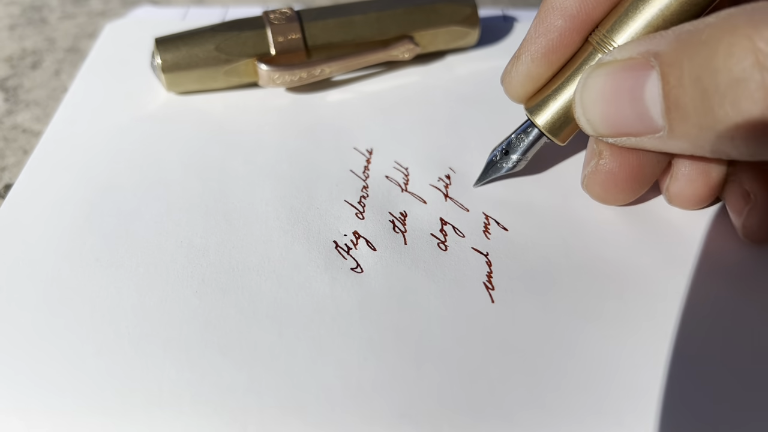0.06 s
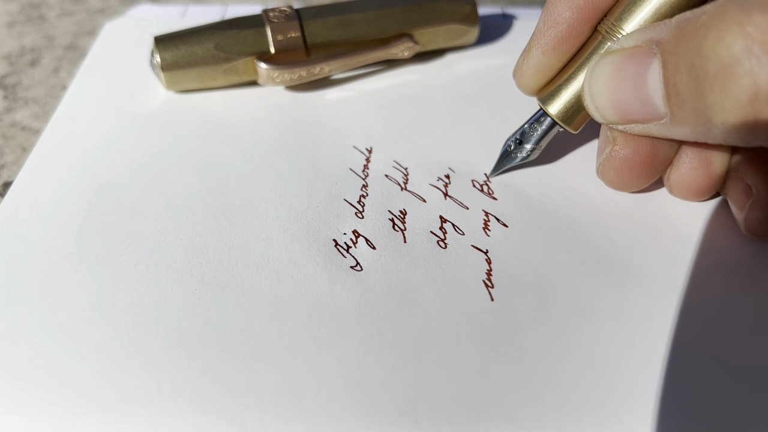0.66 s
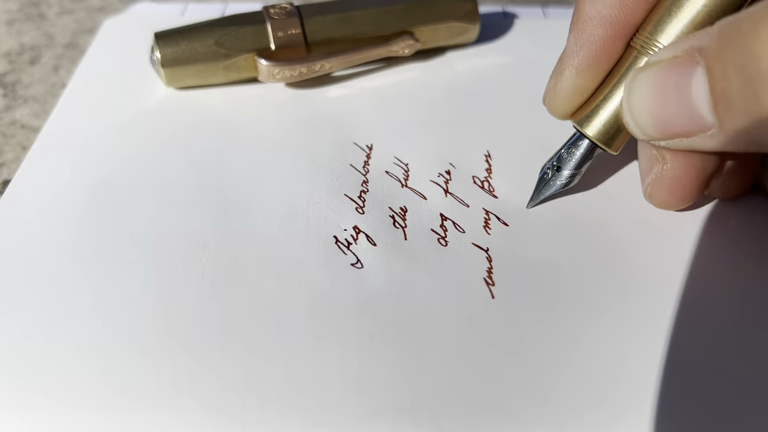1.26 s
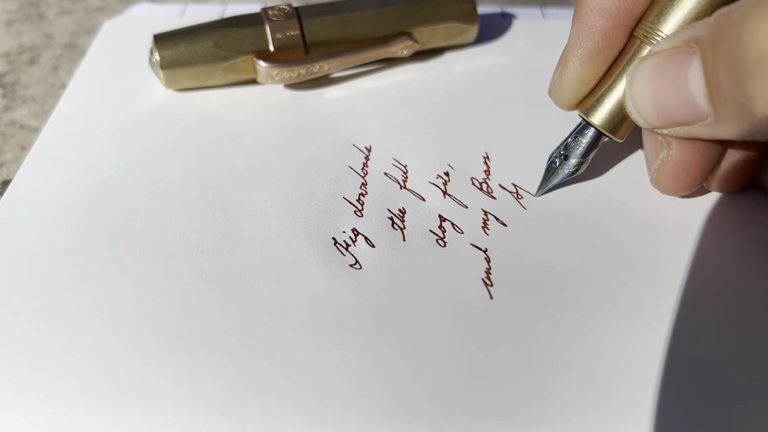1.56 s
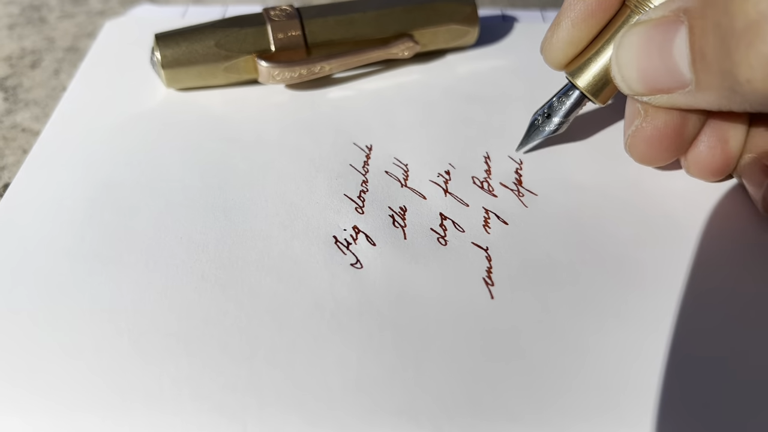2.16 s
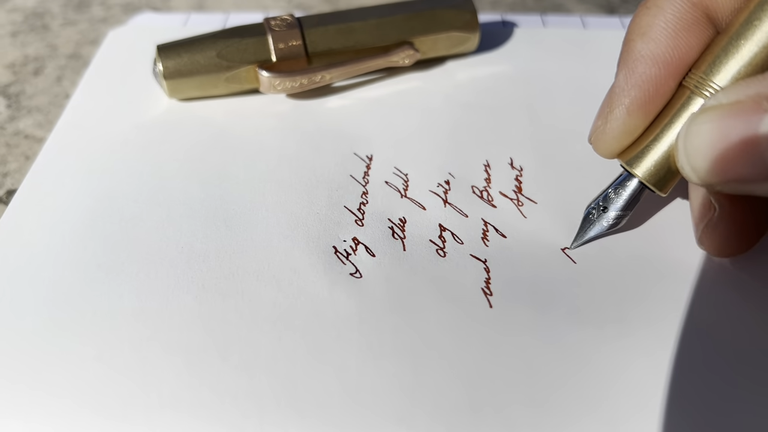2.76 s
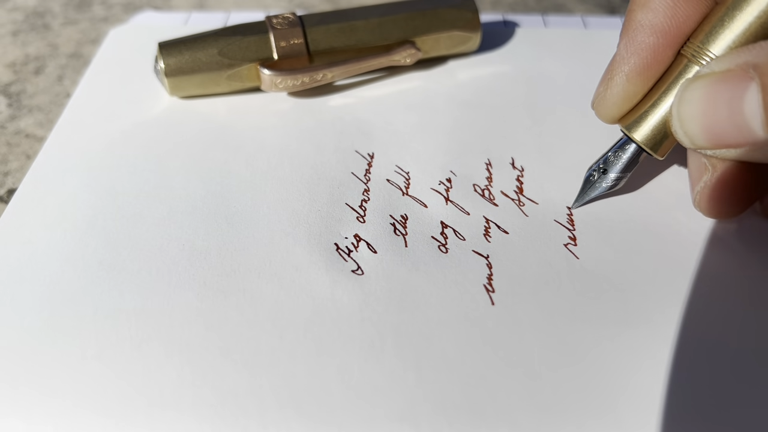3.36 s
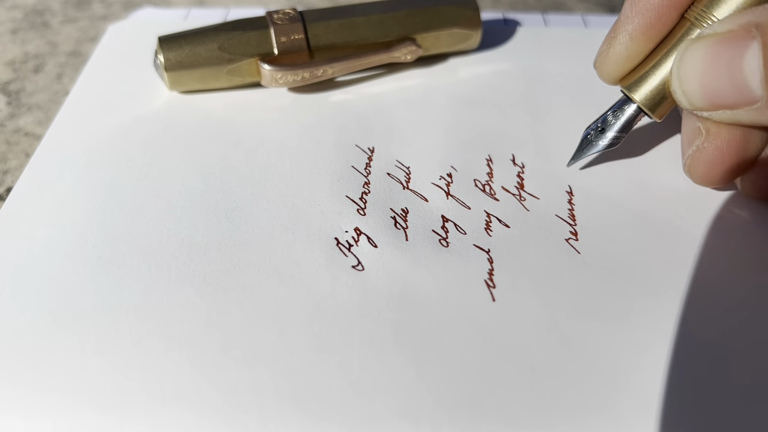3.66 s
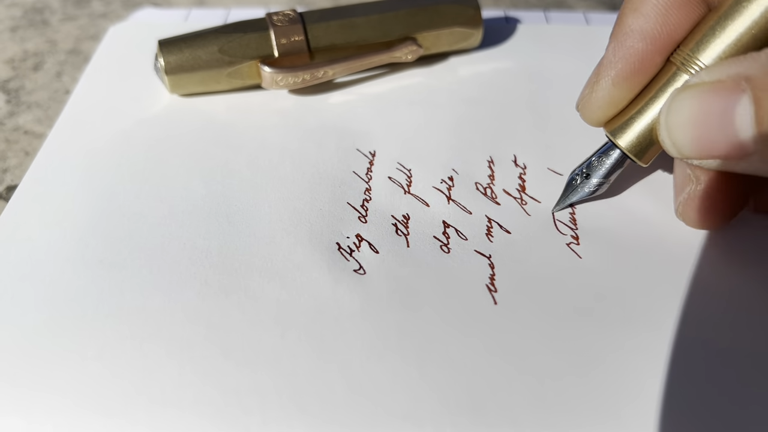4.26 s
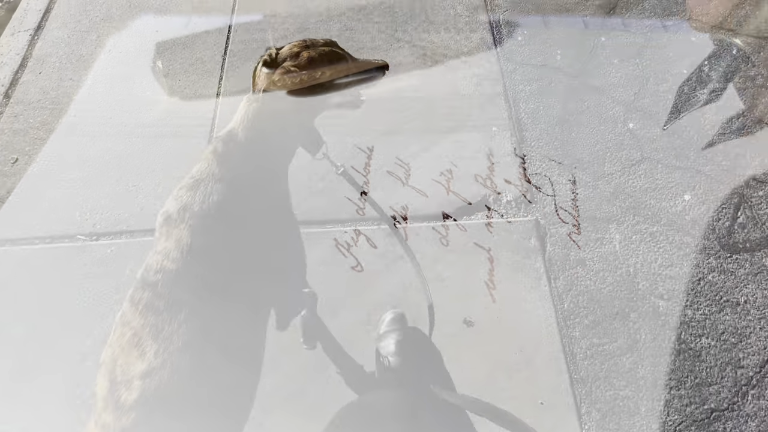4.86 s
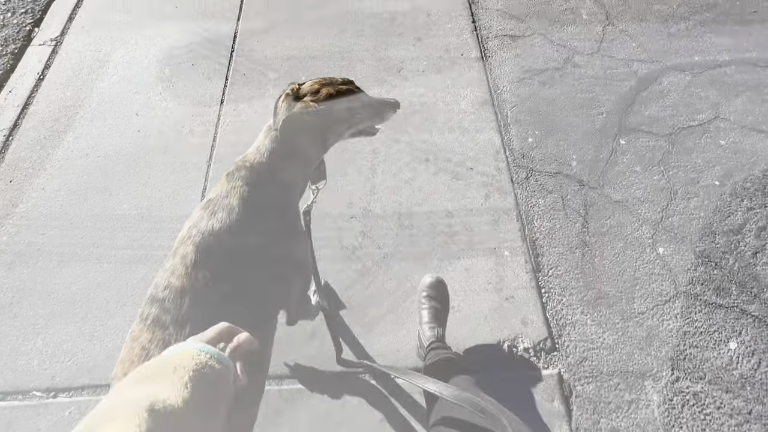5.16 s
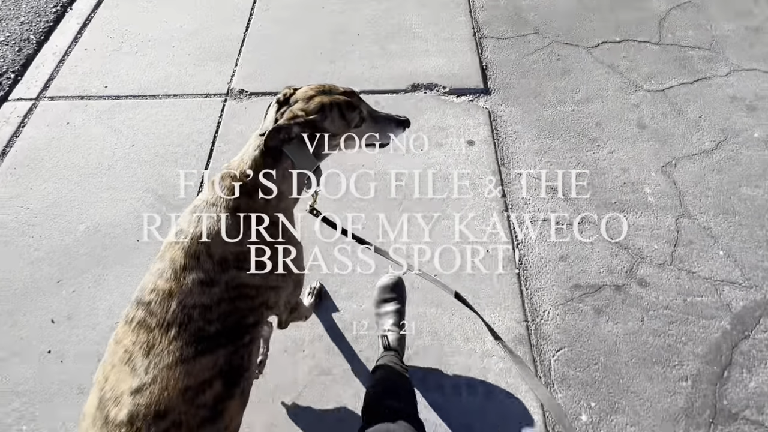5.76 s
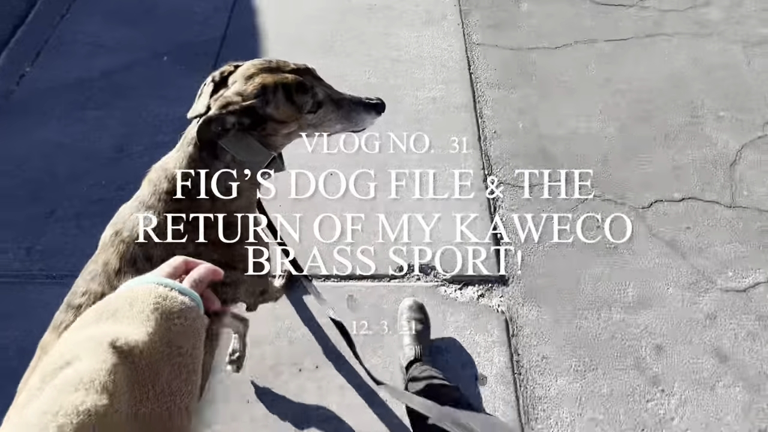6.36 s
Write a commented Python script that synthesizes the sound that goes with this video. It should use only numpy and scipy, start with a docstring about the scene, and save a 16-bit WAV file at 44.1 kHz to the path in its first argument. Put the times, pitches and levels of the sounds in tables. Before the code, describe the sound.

From the start, a fountain pen scratches quietly on paper close by, in short, uneven strokes with a thin metallic edge. Distant traffic hums low and steady underneath. The nib clicks faintly as it touches down, and a hand brushes over the sheet between words at about 1.1 and 2.4 seconds, with a dull rub near 3.2 seconds. The hardest strokes and a sharper tap come around 4.3 seconds.

From about 4.5 seconds the scene fades into a much louder street. A vehicle accelerates slightly to the left, its low engine note climbing steadily and strongest around 5.3 seconds. Its tyres swell to a roar as it passes near 5.8 seconds, then turn to a brighter rush over road rumble. A few faint ticks come from the pavement. The sound cuts out twice, very briefly, around 6.5 seconds.

```python
"""A fountain pen scratches a few words on a sheet of paper, over the low hum of distant traffic.
The nib drags across the fibres, shaking the sheet and setting its steel tines faintly ringing;
between words the hand slides over the paper. The scene then fades over to a pavement, where a vehicle
accelerates past, its exhaust note climbing and its tyres swelling to a rush as the treads pump air.
Near the end the sound cuts out twice, very briefly."""
import sys
import numpy as np
from scipy import signal
from scipy.fft import rfft, irfft
from scipy.io import wavfile
from scipy.ndimage import uniform_filter1d

SR = 44100
rng = np.random.default_rng(int(sys.argv[2]) if len(sys.argv) > 2 else 0)


def master_out(mix):
    """Clip the mix to full scale and print it as 16-bit PCM to the path in sys.argv[1]."""
    frames = np.transpose(np.atleast_2d(mix))
    ceiling = np.clip(frames, -1, 1)
    pcm = np.round(ceiling * 32767).astype(np.int16)
    wavfile.write(sys.argv[1], SR, pcm)


N = 287517
TIME = np.arange(N) / SR
FREQS = np.maximum(np.fft.rfftfreq(N, 1 / SR), 1)


def from_db(db):
    """Decibels to gain."""
    return 10 ** (np.asarray(db) / 20)


def rms_one(x):
    """Scale to unit power."""
    return x / np.sqrt(np.mean(x ** 2) + 1e-20)


def in_time(rows):
    """Breakpoints (time_s, values...) to one automation curve per value."""
    time_s, *columns = np.transpose(rows)
    return [np.interp(TIME, time_s, column) for column in columns]


def per_hz(points):
    """Breakpoints (freq_hz, value) to a curve over frequency."""
    hz, value = np.transpose(points)
    return np.interp(np.log(FREQS), np.log(hz), value)


def drift(rate_hz):
    """Slow random wander; rms 1."""
    return rms_one(irfft(rfft(rng.standard_normal(N)) / (1 + (FREQS / rate_hz) ** 2), N))


def white():
    """Two unrelated white noises."""
    return rng.standard_normal((2, N))


def stereo(pair, likeness):
    """Mix two unrelated signals as mid and side, with a left-right correlation set by band."""
    alike = np.clip(per_hz(likeness), -.99, .99)
    mid, side = rfft(pair)
    return irfft(np.sqrt(1 + alike) * mid + np.sqrt(1 - alike) * side * [[1], [-1]], N)


def pan(balance_db):
    """Left and right gains; positive leans left."""
    return from_db(np.array([[balance_db], [-balance_db]]) / 2)


def colour(x, spectrum):
    """Shape a signal with an EQ curve; rms 1."""
    return rms_one(irfft(rfft(x) * from_db(per_hz(spectrum)), N))


def resonate(x, hz, width_hz):
    """One resonance, gain 1 at its peak."""
    radius = np.exp(-np.pi * width_hz / SR)
    feedback = [1, -2 * radius * np.cos(2 * np.pi * hz / SR), radius ** 2]
    return signal.lfilter(np.array([1, 0, -1]) * (1 - radius ** 2) / 2, feedback, x)


def band(x, hz, width_hz):
    """A resonance with steep skirts; rms 1."""
    return rms_one(resonate(resonate(x, hz, width_hz), hz, width_hz))


def firing(hz, waver):
    """Phase of an engine that never runs quite evenly."""
    return 2 * np.pi * np.cumsum(hz * (1 + waver * drift(11.5))) / SR


def street_fade(start_s=4.47, end_s=5.375):
    """Crossfade from the writing (0) to the street (1)."""
    return np.interp(TIME, [start_s, end_s], [0, 1])


# Tone of the distant traffic bed: freq_hz, gain_db
TRAFFIC_EQ = [(25, -50), (48, -23), (64, -10.5), (80, -2.5), (115, 1), (220, -1), (330, -6), (550, -13),
              (900, -17.5), (1700, -17.5), (2700, -27), (4200, -39.5), (7000, -47.5), (16000, -51.5)]
# Its stereo image, wider in the highs: freq_hz, correlation
FAR_IMAGE = [(60, 1), (150, 0.98), (300, 0.9), (600, 0.71), (1200, 0), (3000, 0), (16000, 0.16)]
# A far motor gathering speed: time_s, firing_hz, firing_db, octave_db
FAR_MOTOR_REVS = [(0, 99, -59, -59.5), (.6, 103, -65, -53.5), (.9, 110.3, -76, -68),
                  (1.15, 114.2, -55.5, -59), (1.45, 114.3, -56.5, -62), (1.75, 120.7, -52.5, -66.5),
                  (2.0, 129.5, -66, -95), (2.5, 131.3, -94, -89)]
def distant_traffic(rumble_db=-52.0, hiss_db=-64.0, split_hz=450, hum_hz=64.8, hum_db=-69):
    """Dull rumble and road hiss with a steady hum and one far motor; they fade as the street comes in."""
    air = colour(stereo(white(), FAR_IMAGE), TRAFFIC_EQ)
    lows = irfft(rfft(air) / (1 + (FREQS / split_hz) ** 4), N)
    bed = from_db(rumble_db) * rms_one(lows) + from_db(hiss_db) * rms_one(air - lows)
    firing_hz, firing_db, octave_db = in_time(FAR_MOTOR_REVS)
    phase = firing(firing_hz, waver=0.0077)
    motor = from_db(firing_db) * np.sin(phase) + from_db(octave_db) * np.sin(2 * phase)
    hum = from_db(hum_db) * np.sin(firing(hum_hz, waver=0.015))
    return (bed + np.sqrt(2) * (motor + hum)) * (1 - street_fade())


# Stereo image of all the street noise: freq_hz, correlation
STREET_IMAGE = [(30, .05), (65, 0.06), (120, 0.31), (250, 1), (900, 0.86), (2000, 0.28), (5000, 0.28),
                (16000, 0.19)]
def far_tyres(level_db=-52.0, hz=1400, width_hz=560):
    """The steady hiss of tyres farther down the street."""
    lowpass = signal.butter(6, hz + width_hz, fs=SR, output="sos")
    hiss = signal.sosfilt(lowpass, band(white(), hz, width_hz))
    return from_db(level_db) * street_fade() * stereo(hiss, STREET_IMAGE)


PASS_S = 5.8  # the vehicle draws level
def passing(peak_db, after_s, near_s, beam=1):
    """Pass-by swell, faded in with the street: level falls with distance, faster for beamed sound."""
    distance = np.hypot(1, (TIME - PASS_S - after_s) / near_s)
    return street_fade() * from_db(peak_db) / distance ** beam


# Notes of other vehicles: pitch_at_pass_hz, climb_hz_per_s, relative_db
TRAFFIC_TONES = [(202.8, 3, -9.5), (290.8, 7, -10.5)]
def other_traffic(rough_db=4.0):
    """Other vehicles in the street add wavering, slowly climbing tones."""
    tones = np.zeros(N)
    for pitch_hz, climb_hz_per_s, relative_db in TRAFFIC_TONES:
        gain = from_db(relative_db + rough_db * drift(15))
        tones += gain * np.sin(firing(pitch_hz + climb_hz_per_s * (TIME - PASS_S), waver=0.0097))
    return np.sqrt(2) * tones


# Bands of tread hiss: pitch_hz, width_hz, peak_db, peak_after_pass_s
TREAD_BANDS = [(700, 200, -48, .05), (2440, 310, -63.5, .05), (4230, 450, -71.5, .02),
               (10800, 5600, -73, 0.57)]
def treads(near_s=0.17):
    """Air is pumped out of the tyre treads; each pitch is beamed its own way and sweeps past."""
    air = sum(passing(peak_db, after_s, near_s) * band(white(), pitch_hz, width_hz)
              for pitch_hz, width_hz, peak_db, after_s in TREAD_BANDS)
    return stereo(air, STREET_IMAGE)


# The near engine revving up: time_s, firing_hz, level_db
ENGINE_REVS = [(4.36, 103, -92), (4.48, 104, -49.5), (4.88, 108.7, -49.5), (5.17, 114.1, -36.5),
               (5.33, 121.6, -32.5), (5.52, 126.4, -35.5), (5.69, 129.5, -44.5), (5.98, 141.5, -42),
               (6.52, 156.6, -47)]
# Partials of its exhaust: firing_multiple, relative_db
EXHAUST_ORDERS = [(1, -0.5), (1.5, -17), (2, -28), (3, -15.5), (4, -25.5)]
def engine(rough_db=1.1):
    """Exhaust orders climb as the vehicle accelerates, each fluttering in level."""
    firing_hz, level_db = in_time(ENGINE_REVS)
    phase = firing(firing_hz, waver=0.0077)
    exhaust = sum(from_db(level_db + relative_db - rough_db * drift(6.6)) * np.sin(multiple * phase)
                  for multiple, relative_db in EXHAUST_ORDERS)
    audible = TIME > ENGINE_REVS[0][0]
    return np.sqrt(2) * audible * exhaust


# Droning resonances of the street traffic: pitch_hz, width_hz, relative_db
STREET_DRONES = [(110, 9, -33), (210.7, 14, -13.5), (282.6, 10, -12), (467.3, 14.4, -14)]
# Low road rumble, midrange tyre roar and bright tyre rush: freq_hz, gain_db
RUMBLE_EQ = [(20, -39), (35, -31), (52, 0), (70, -1), (100, 2.5), (170, -4.5), (260, -4.5), (380, -11),
             (480, -10), (700, -52), (1200, -63)]
ROAR_EQ = [(300, -7), (560, -1.5), (740, 4.5), (870, 9.5), (980, 3.5), (1150, 1), (1650, -9), (2000, -16),
           (2650, -23), (3100, -33), (5000, -91)]
RUSH_EQ = [(300, -26), (600, 8), (790, 4.5), (1000, 2.5), (1900, -1.5), (2700, -6), (3200, -13),
           (4400, -16), (5200, -19.5), (6600, -19), (10000, -27), (12200, -32.5), (14000, -56),
           (16000, -33)]
# Panning of the tyres by band: freq_hz, left_minus_right_db
TYRE_PAN = [(400, 13), (700, 2.5), (1290, 5), (2200, -0.5), (4400, 4.5), (8000, 3.5), (15000, -11)]
def street(rumble_db=2.03, flutter_db=1.24, lag_s=0.00046):
    """Engine, rumble and tyres swell past, off to the left, so they reach the right side later."""
    low_swell = passing(peak_db=-36.5, after_s=0.43, near_s=0.83)
    roar_swell = passing(peak_db=-38.0, after_s=-0.074, near_s=0.43)
    rush_swell = passing(peak_db=-43.0, after_s=0.31, near_s=0.64, beam=1.39)
    drone = sum(from_db(relative_db) * band(rng.standard_normal(N), pitch_hz, width_hz)
                for pitch_hz, width_hz, relative_db in STREET_DRONES)
    rumble = low_swell * (from_db(rumble_db) * colour(stereo(white(), STREET_IMAGE), RUMBLE_EQ) + drone)
    roar = roar_swell * from_db(flutter_db * drift(20)) * colour(stereo(white(), STREET_IMAGE), ROAR_EQ)
    # the bright rush takes over from the roar as the vehicle goes by
    rush = rush_swell * colour(stereo(white(), STREET_IMAGE), RUSH_EQ)
    tyre_gains = from_db(per_hz(TYRE_PAN) * [[.5], [-.5]])
    tyres = irfft(rfft(roar + rush + treads() + far_tyres()) * tyre_gains, N)
    motors = engine() + low_swell * other_traffic()
    left, right = rumble * pan(balance_db=1.3) + tyres + motors * pan(balance_db=1.5)
    return np.array([left, np.interp(TIME - lag_s, TIME, right)])


# Small ticks of the pen, then of things on the pavement: start_s, level_db, pitch_hz
TICK_CUES = [(4.202, -73, 8000), (4.789, -61, 6460), (4.799, -67, 8500), (4.849, -56.5, 3850),
             (5.035, -63, 5830), (5.067, -66, 8500), (5.084, -57, 9490), (5.410, -57, 9000),
             (5.572, -53.5, 6960), (6.355, -46.5, 7360)]
def ticks(attack_s=0.0018, trim_db=-3.5, width_share=0.62):
    """Each tick is a short crunch around a pitch of its own."""
    track = np.zeros((2, N))
    age = TIME[:SR // 20] / attack_s
    envelope = age * np.exp(1 - age)
    for start_s, level_db, pitch_hz in TICK_CUES:
        at = int(start_s * SR)
        crunch = band(rng.standard_normal((2, len(age))), pitch_hz, width_share * pitch_hz)
        track[:, at:at + len(age)] += from_db(level_db + trim_db) * envelope * crunch
    return track


def fibres(snaps_per_s, spread_db, smooth_share):
    """Paper fibres snap free at random, a few of them hard, over smooth friction."""
    sizes = from_db(spread_db * np.minimum(rng.exponential(1, (2, N)), 4))
    snaps = (rng.random((2, N)) < snaps_per_s / SR) * sizes * np.sign(white())
    return rms_one(rms_one(snaps) + smooth_share * white())


def stroke(fastest_s, length_s):
    """The samples of one movement and its speed, which rises and falls in an arch."""
    start_s, end_s = fastest_s - length_s / 2, fastest_s + length_s / 2
    span = slice(max(int(start_s * SR), 0), int(end_s * SR))
    return span, np.sin(np.pi * np.interp(TIME[span], [start_s, end_s], [0, 1]))


def held(start_s, end_s, edge_s):
    """Attack, hold and release of a steady contact."""
    return np.clip(np.minimum(TIME - start_s, end_s - TIME) / edge_s + 1, 0, 1)


# The hand sliding over the sheet: fastest_s, length_s, level_db
HAND_SLIDES = [(1.103, 0.18, -65), (1.133, 0.099, -58), (2.359, 0.14, -55), (2.397, .1, -55),
               (3.815, .15, -68.5), (3.978, .045, -71.5), (4.055, 0.13, -74.5), (4.906, .075, -68)]
# Skin on paper, brushing lightly and rubbing dully: freq_hz, gain_db
BRUSH_EQ = [(600, -20), (1100, -4), (1600, 0), (2100, -3), (3200, -2), (4200, -10), (6300, -15),
            (8000, -11), (10500, -13), (13000, -10), (16000, -9)]
RUB_EQ = [(250, -9), (480, 4.5), (700, -8.5), (1200, -3), (1600, -9), (2500, -20), (5000, -50), (9000, -87)]
# Stereo images of the brushing, and of the sheet under rub and nib: freq_hz, correlation
BRUSH_IMAGE = [(1500, 0.66), (3000, 0.11), (8000, 0.16), (13000, 0.15)]
SHEET_IMAGE = [(500, 0.86), (1700, 0.93), (2500, 0.039), (4000, 0.16), (16000, 0.57)]
def hand(trim_db=-0.3, sharpness=2.85, rub_db=-57.8):
    """Skin brushes the sheet with an airy, fine-grained hiss; once, the side of the hand drags dully."""
    pressure = np.zeros(N)
    for fastest_s, length_s, level_db in HAND_SLIDES:
        span, speed = stroke(fastest_s, length_s)
        pressure[span] += from_db(level_db + trim_db) * speed ** sharpness
    grain = fibres(snaps_per_s=9800, spread_db=4.5, smooth_share=0.88)
    brush = colour(stereo(grain, BRUSH_IMAGE), BRUSH_EQ)
    rub = colour(stereo(white(), SHEET_IMAGE), RUB_EQ)
    return pressure * brush + from_db(rub_db) * held(start_s=3.12, end_s=3.33, edge_s=.03) * rub


# Resonances of the sheet under the nib: pitch_hz, width_hz, gain_db
SHEET_MODES = [(900, 270, -13), (1105, 136, 4), (1203, 112, 7), (1500, 186, 6), (1675, 180, 3.5),
               (1915, 143, 2.5), (2120, 410, -7.5), (2730, 110, -21), (3130, 99, -15), (4420, 300, -51)]
def sheet(force, low_cut_hz=1080):
    """The paper rings in modes of alternating polarity and radiates little low end."""
    modes = sum((-1) ** k * from_db(gain_db) * resonate(force, pitch_hz, width_hz)
                for k, (pitch_hz, width_hz, gain_db) in enumerate(SHEET_MODES))
    return signal.sosfilt(signal.butter(4, low_cut_hz, "high", fs=SR, output="sos"), modes)


# The nib touching down or snagging: start_s, peak_db
NIB_CATCHES = [(1.357, -47), (1.597, -44), (2.236, -55), (2.663, -45.5), (2.803, -50), (2.995, -43.5),
               (4.281, -39), (4.345, -31.5)]
def catches():
    """Each catch of the nib is one knock on the sheet."""
    knocks = np.zeros(N)
    for start_s, peak_db in NIB_CATCHES:
        knocks[int(start_s * SR)] = from_db(peak_db)
    unit_peak = np.abs(sheet(signal.unit_impulse(SR // 20))).max()
    return sheet(knocks + 1e-18) / unit_peak


# Friction hiss of the fibres: freq_hz, gain_db
FIBRE_EQ = [(400, -3), (800, 7.5), (2500, 2.5), (3600, -9.5), (4500, -5), (6000, -8.5), (9000, -9),
            (10000, -16), (11200, -14), (13000, -25), (16000, -16)]
# Runs of letters, nib down and held at one angle: start_s, end_s, drag_db, ring_gain_db
PEN_WORDS = [(0.092, 0.427, -78.5, -10), (.53, 1.06, -85, -15), (1.29, 1.647, -69, -14.5),
             (1.672, 2.31, -88, -13), (2.646, 3.665, -83, -19.5), (3.8, 3.83, -81, -4.5),
             (4.233, 4.372, -67.5, -15.5)]
# Pen strokes, ringing higher or lower with their direction: fastest_s, length_s, level_db, pitch_hz
PEN_STROKES = [(0.116, 0.045, -53, 7150), (0.176, .055, -53.5, 7250), (0.23, 0.048, -60, 7100),
               (.285, 0.029, -67.5, 7640), (.324, 0.042, -63.5, 7050), (0.38, 0.082, -70.5, 7500),
               (0.553, 0.031, -63, 6860), (0.665, 0.017, -68, 7050), (.699, 0.039, -67, 7180),
               (0.778, .053, -62, 7600), (.856, 0.045, -73, 7110), (.908, 0.061, -66, 7260),
               (1.049, 0.031, -59, 7160), (1.311, 0.053, -49, 7430), (1.367, .036, -61, 7100),
               (1.477, .046, -62, 7600), (1.541, 0.043, -60.5, 6960), (1.596, 0.025, -56, 7050),
               (1.62, 0.029, -61, 7500), (1.68, 0.028, -67, 7030), (1.729, 0.054, -61, 7490),
               (1.794, 0.024, -66, 7300), (1.827, 0.03, -65, 7630), (1.888, 0.031, -68.5, 7500),
               (1.964, .032, -70, 7660), (1.995, 0.044, -60, 7100), (2.046, 0.022, -58, 6960),
               (2.075, 0.036, -63.5, 7280), (2.24, .03, -68, 7830), (2.282, 0.056, -62, 7600),
               (2.68, .038, -54.5, 7390), (2.774, 0.071, -72, 7040), (2.81, .04, -62.5, 7620),
               (2.872, 0.047, -67, 7120), (2.912, .045, -63, 7600), (2.943, 0.033, -54, 7250),
               (2.999, 0.052, -61, 7270), (3.04, 0.038, -59.5, 7530), (3.14, .05, -69, 7460),
               (3.218, 0.038, -64, 7500), (3.317, 0.05, -62, 7600), (3.37, .029, -67, 7160),
               (3.42, 0.025, -62, 7450), (3.501, 0.029, -58.5, 7700), (3.569, 0.033, -72, 7200),
               (3.634, 0.037, -57.5, 7620), (3.808, 0.018, -59.5, 7330), (4.255, .035, -56, 7600),
               (4.275, 0.035, -45, 7650), (4.3, .07, -53.5, 7200), (4.351, 0.035, -50.5, 7400)]
def pen(paper_db=-1.5, hiss_db=-14.5, rasp_db=-11, scrape_db=-66,
        nib_db=-4.0, nib_hz=7250, nib_width_hz=900, nib_hiss_db=3.5):
    """The dragging nib shakes the sheet and rings at a pitch that changes with each stroke."""
    drag = fibres(snaps_per_s=1100, spread_db=3.0, smooth_share=1.0)
    hiss = colour(drag, FIBRE_EQ)
    force = sum(from_db(drag_db) * held(start_s, end_s, edge_s=0.0087)
                for start_s, end_s, drag_db, _ in PEN_WORDS)
    tines = force * band(drag, nib_hz, nib_width_hz)
    for fastest_s, length_s, level_db, pitch_hz in PEN_STROKES:
        span, speed = stroke(fastest_s, length_s)
        push = from_db(level_db) * speed
        force[span] += push
        tines[:, span] += push * band(drag[:, span], pitch_hz, nib_width_hz)
    # the steel tines sing inside a broader hiss, as freely as the pen's angle lets them
    ring_db, = in_time([(s, db) for start_s, end_s, _, db in PEN_WORDS for s in (start_s, end_s)])
    ring = from_db(ring_db) * (tines + from_db(nib_hiss_db) * force * hiss)
    # only the hardest strokes tear at the fibres and rasp
    effort = force / force.max()
    rasp = effort ** 2 * band(drag, hz=3050, width_hz=1300)
    scratch = from_db(paper_db) * rms_one(sheet(drag)) + from_db(hiss_db) * hiss + from_db(rasp_db) * rasp
    # a dull scrape grows more slowly with force, so light strokes sound softer
    scrape = from_db(scrape_db) * np.sqrt(effort) * band(drag, hz=900, width_hz=400)
    return stereo(force * scratch + scrape + from_db(nib_db) * ring, SHEET_IMAGE)


def scene():
    """Writing over far traffic, then the street."""
    return pen() + catches() + hand() + ticks() + distant_traffic() * pan(balance_db=1.47) + street()


# Brief gaps of silence: start_s, end_s
GAPS = [(6.439, 6.461), (6.482, 6.506)]
def record(dry, high_cut_hz=15700):
    """The sound cuts out twice near the end; the top is cut steeply."""
    gate = 1. - sum((TIME > start_s) & (TIME < end_s) for start_s, end_s in GAPS)
    gate = uniform_filter1d(gate, size=90)  # 2 ms fades
    return irfft(rfft(dry * gate) / np.sqrt(1 + (FREQS / high_cut_hz) ** 200), N)


dry = scene()
out = record(dry)
master_out(out)
```